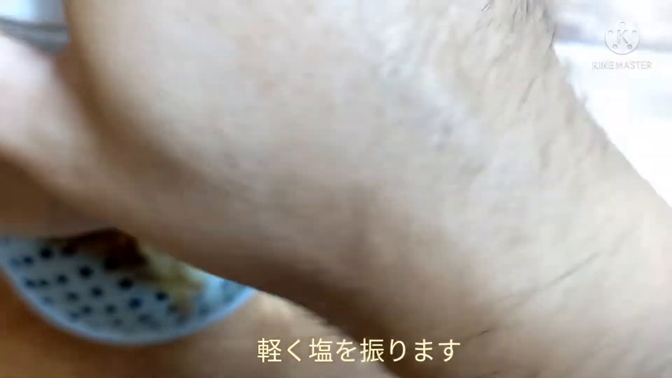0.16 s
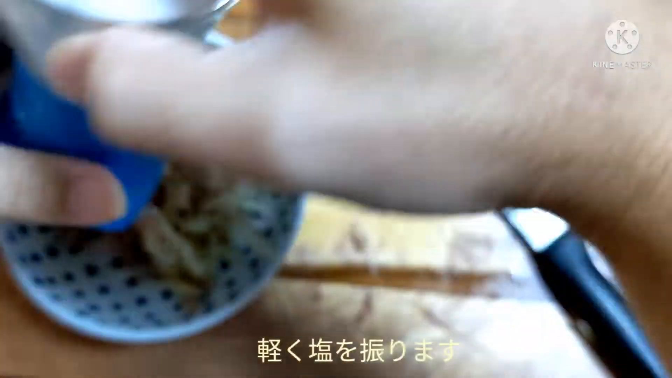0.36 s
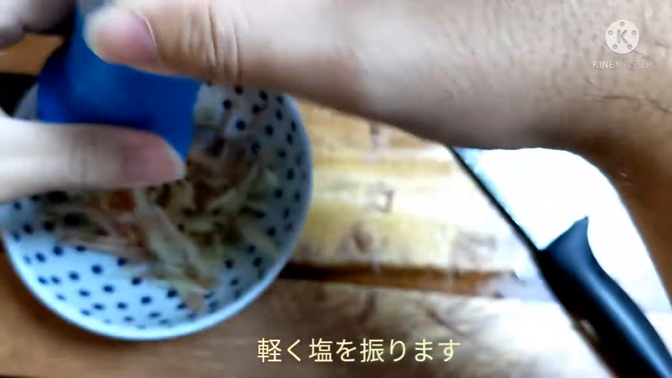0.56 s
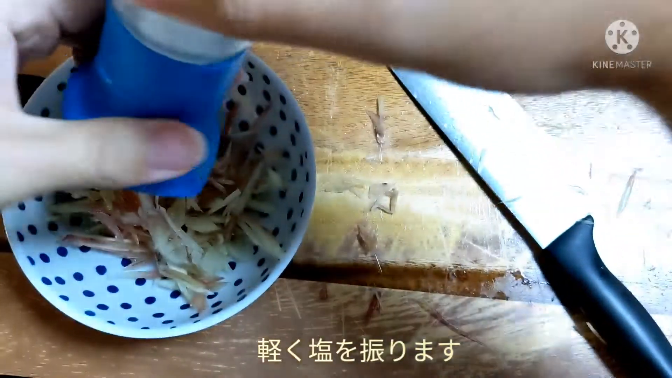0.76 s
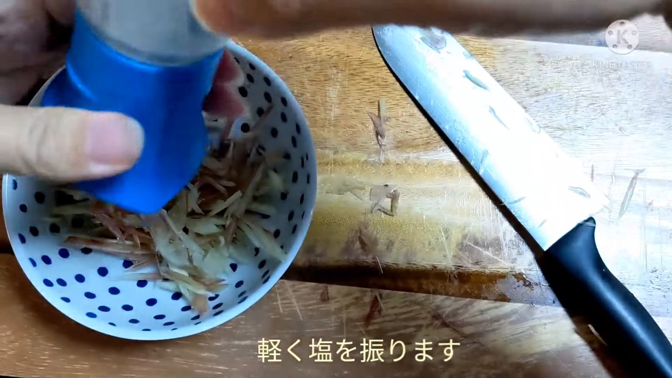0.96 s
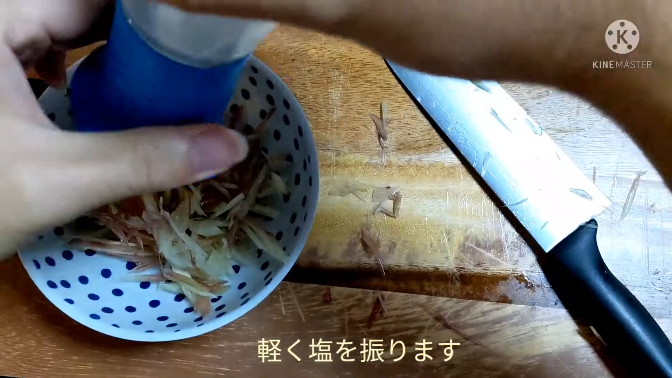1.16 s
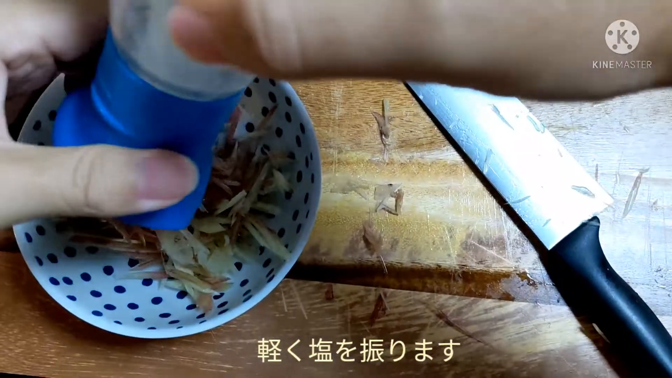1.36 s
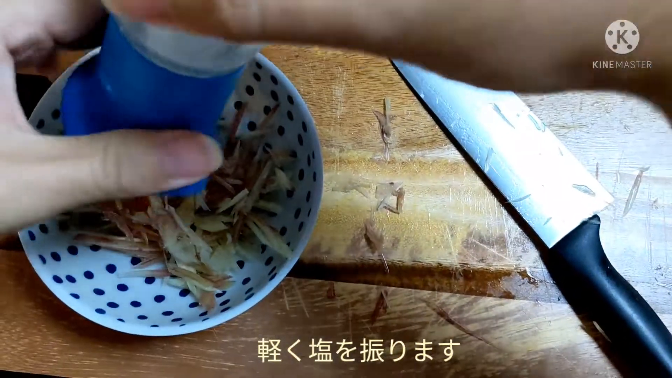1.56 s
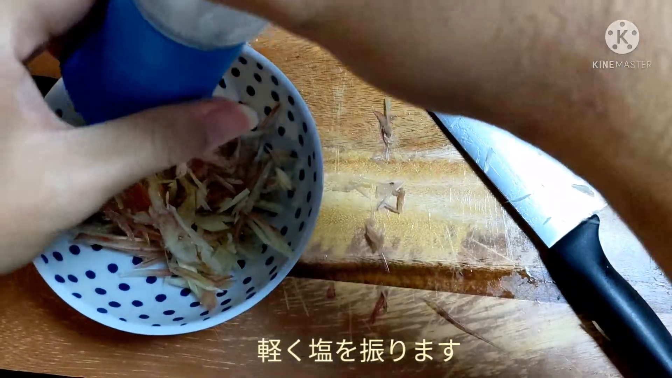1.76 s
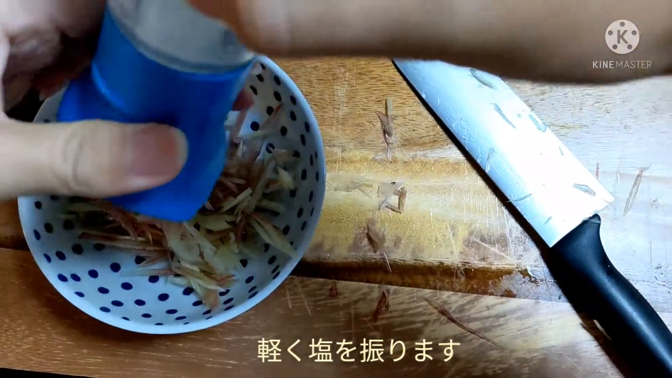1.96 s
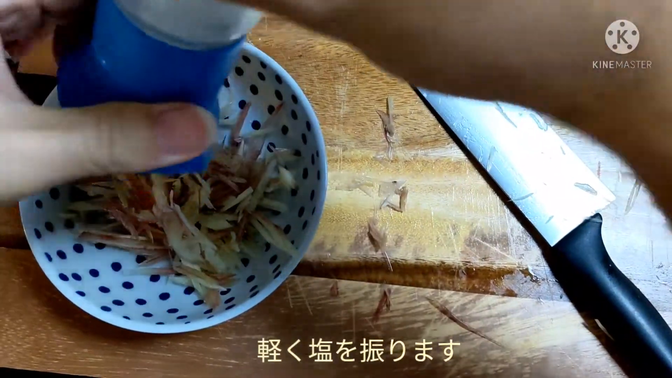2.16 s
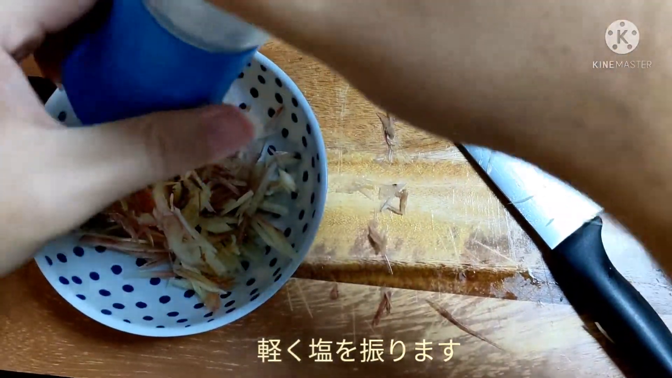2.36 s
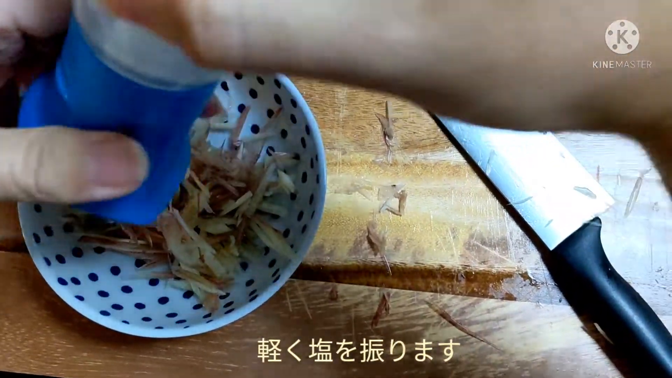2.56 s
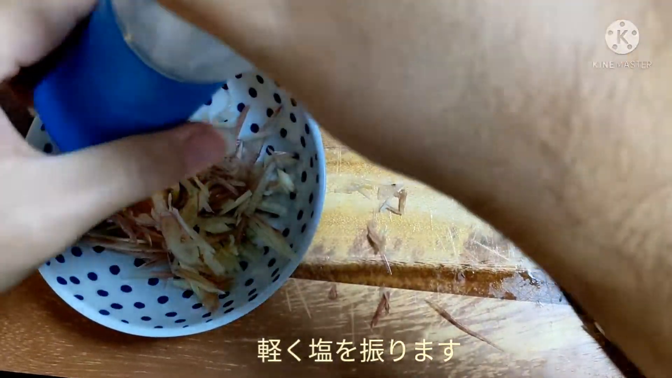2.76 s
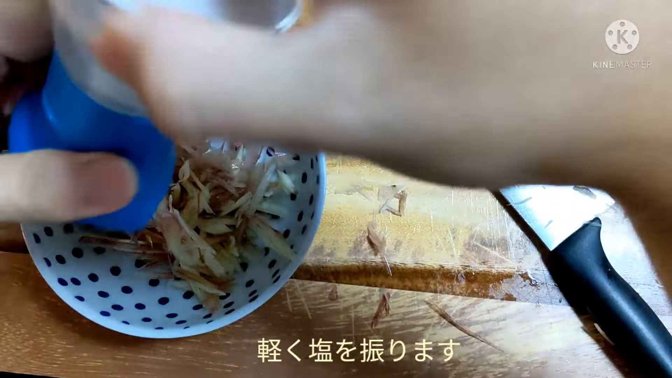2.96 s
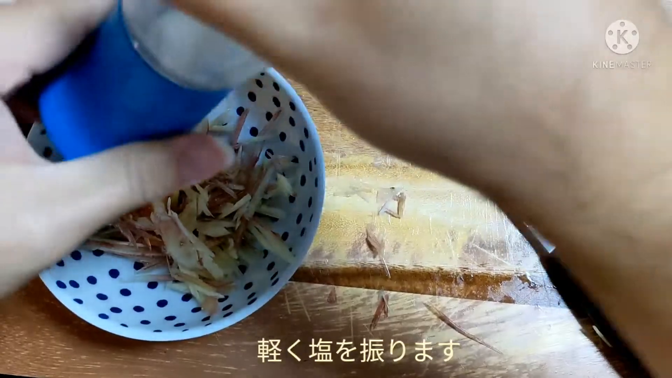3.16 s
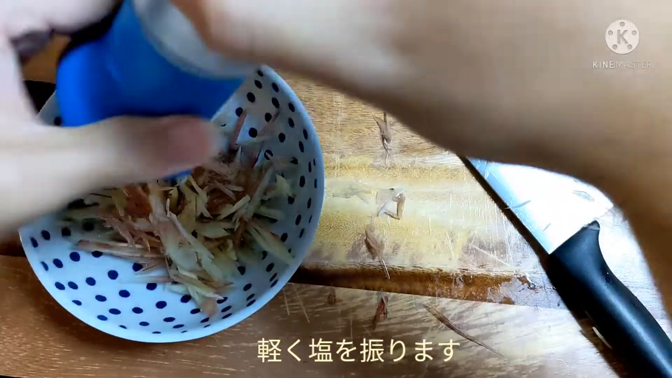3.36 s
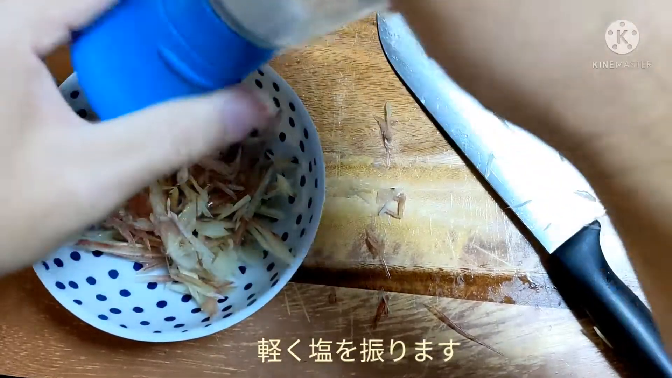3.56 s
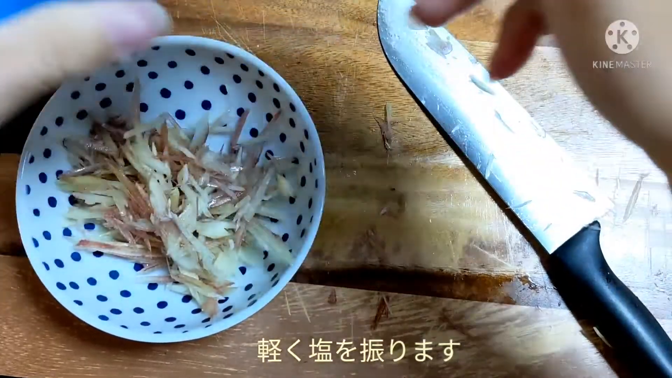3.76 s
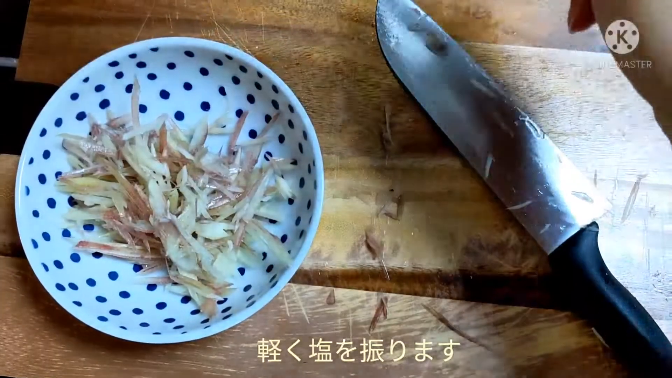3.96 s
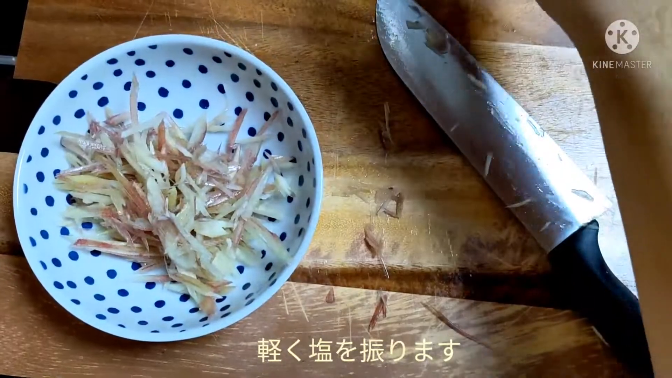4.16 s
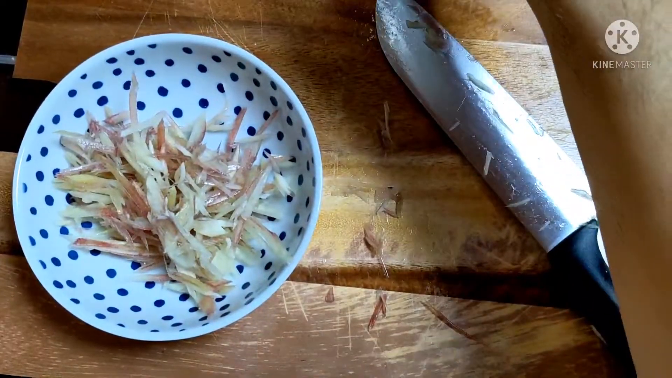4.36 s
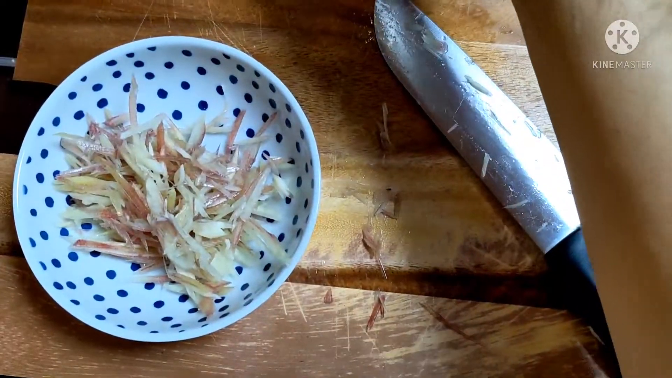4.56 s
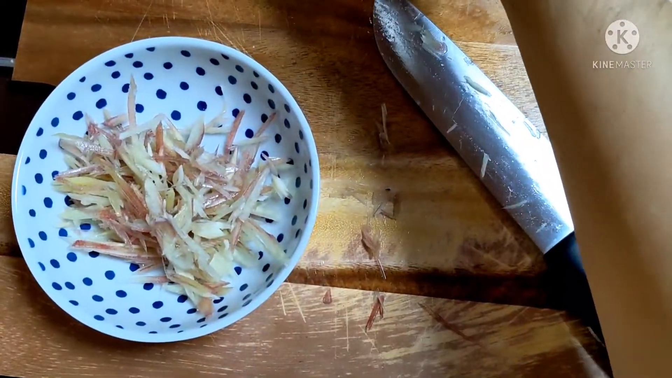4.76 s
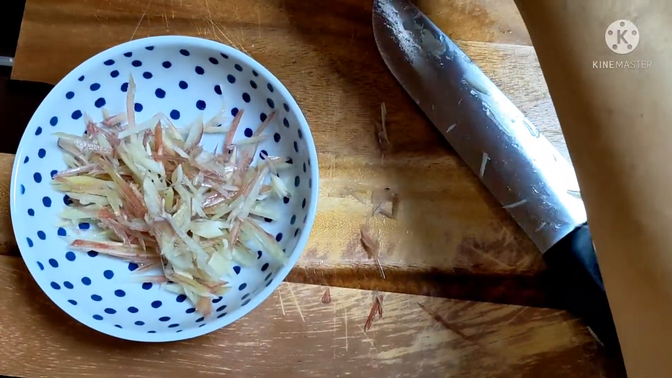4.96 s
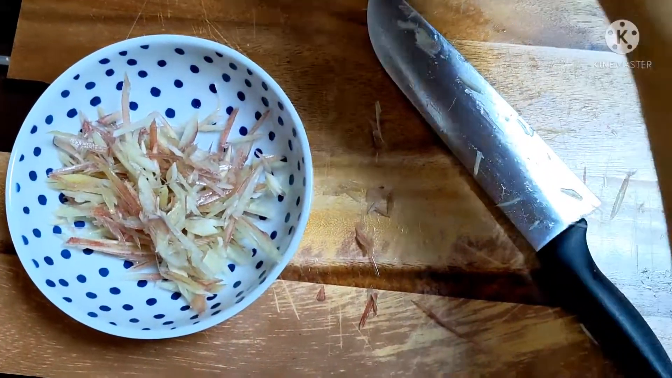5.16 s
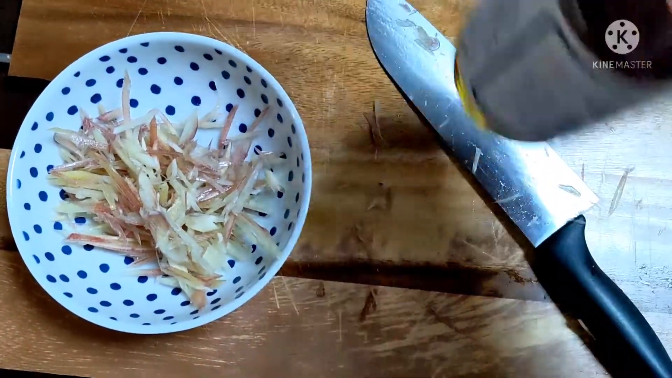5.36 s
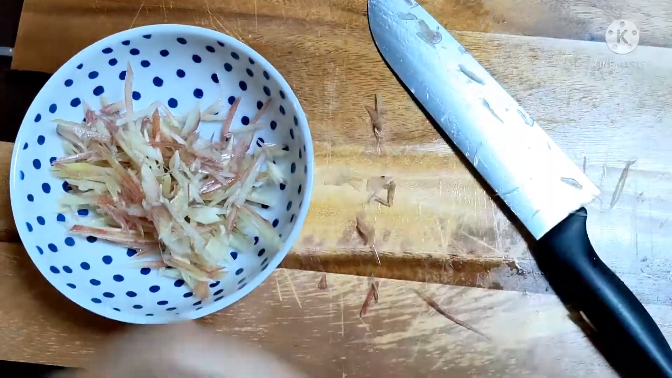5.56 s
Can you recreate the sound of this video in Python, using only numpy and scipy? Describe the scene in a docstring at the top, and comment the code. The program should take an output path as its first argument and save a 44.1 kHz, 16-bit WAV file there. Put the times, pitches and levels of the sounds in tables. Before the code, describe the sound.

In a small quiet kitchen, close to a phone's stereo microphones, a plastic salt mill is twisted about seventeen times in short strokes, crunching and cracking crystals. A finger squeaks faintly once near the start. After the grinding stops come soft sleeve rustles, then one loud wooden knock with small bumps as the mill is set down, and light shuffling and dry ticks over steady hum and hiss.

```python
"""A quiet kitchen, close to a bowl, heard by the two microphones of a phone over steady hum and hiss.
A plastic salt mill is twisted in short strokes: crunching and cracking salt is noise through the mill's resonances.
A finger squeaks once on the cap, a wavering tone with its lower octave. Later the mill is set down on a wooden
counter and a bottle is picked up: knocks ring decaying modes and a noise thud, among dry ticks, rustles and rumble."""
import sys
import numpy as np
from scipy import signal
from scipy.fft import rfft, irfft, next_fast_len
from scipy.io import wavfile
from scipy.ndimage import uniform_filter1d, map_coordinates

SR = 44100
rng = np.random.default_rng(int(sys.argv[2]) if len(sys.argv) > 2 else 0)


def store_pcm(level_fs):
    """Save levels as 16-bit WAV."""
    pcm = np.round(np.clip(level_fs, -1, 1) * 32767).astype(np.int16)
    wavfile.write(sys.argv[1], SR, np.atleast_2d(pcm).T)


N = 246941

# likeness of left and right microphone: frequency_hz, correlation (-1 to 1)
LIKENESS = [(60, 0.81), (180, 0.97), (550, 0.32), (1650, -0.41), (4970, -0.089), (15000, 0.14)]
# things meeting the counter: start_s, relative level_db, contact_ms (time to the peak of the push)
CONTACTS = [(4.7336, -6, 0.17), (4.965, -45, 0.63), (4.9902, -23.5, 0.75), (5.033, -28.5, 0.83),
            (5.055, -39, 1), (5.083, -34, 1), (5.128, -42.5, 1)]
SLOW_S = np.arange(0, N / SR + .002, .001)  # clock of the slow controls, s


def amp(db):
    """dB to gain."""
    return 10 ** (np.asarray(db) / 20)


def unit(x):
    """Scaled to rms 1."""
    return x / np.sqrt(np.mean(x ** 2) + 1e-20)


def along(points, hz):
    """Values between (Hz, value) points, joined on a log frequency axis."""
    f, v = np.transpose(points)
    return np.interp(np.log(hz + 1), np.log(f + 1), v)


def wobble(rate):
    """A smooth random curve, rate knots a second."""
    knots = rng.standard_normal(int(N * rate / SR) + 4)
    return map_coordinates(knots, [np.arange(N) * rate / SR])


def per_sample(slow):
    """A control on the slow clock, one value per sample."""
    return np.interp(np.arange(N) / SR, SLOW_S, slow)


def swells(rows):
    """Gain of bell-shaped swells (s, half length s, dB, ..), one for each level column."""
    s, half, *levels = np.transpose(rows)[:, :, None]
    bell = np.exp(-((SLOW_S - s) / half) ** 2)
    return [per_sample(np.sqrt((bell * amp(db) ** 2).sum(axis=0))) for db in levels]


def filtered(x, response):
    """x times a complex response of frequency."""
    m = next_fast_len(N + SR // 2)
    return irfft(rfft(x, m) * response(np.fft.rfftfreq(m, 1 / SR)), m)[..., :N]


def resonant(modes):
    """Causal response of (Hz, width Hz, dB) resonances, summed with alternating sign."""
    def response(f):
        total = 0
        for k, (center, width, db) in enumerate(modes):
            mode = 1j * f * width / (center * center - f * f + 1j * f * width)
            total = total + (-1) ** k * amp(db) * mode
        return total
    return response


def rush(spectrum, alike):
    """Stereo noise of rms 1 with a given spectrum; mid and side are mixed to the wanted likeness."""
    def mid_side(hz):
        turn = np.arccos(np.clip(along(alike, hz), -1, 1)) / 2
        return amp(along(spectrum, hz)) * [np.cos(turn), np.sin(turn)]
    mid, side = filtered(rng.standard_normal((2, N)), mid_side)
    return unit(np.array([mid + side, mid - side]))


def tails(t60s, length):
    """Two noises in which each frequency dies at its own speed; left has energy 1."""
    hz, t, z = signal.stft(rng.standard_normal((2, length)), SR, nperseg=256)
    turn = np.arccos(np.clip(along(LIKENESS, hz), -1, 1))[:, None] / 2
    decay = amp(-60 * t / along(t60s, hz)[:, None])
    mid, side = z * decay * [np.cos(turn), np.sin(turn)]
    pair = signal.istft(np.array([mid + side, mid - side]), SR, nperseg=256)[1][:, :length]
    return pair / np.linalg.norm(pair[0])


def room(x, gap_s):
    """The kitchen's answer at both microphones: decaying noise after a gap."""
    # frequency_hz, t60_s
    kitchen_t60 = [(150, .28), (800, .23), (2500, .25), (5000, .2), (12000, .12)]
    late = np.pad(np.atleast_2d(x), ((0, 0), (int(gap_s * SR), 0)))
    return signal.fftconvolve(late, tails(kitchen_t60, SR // 2), axes=1)[:, :N]


def placed(x, pan_db, lag):
    """Left-right level difference, and the left microphone reached lag samples later."""
    left = filtered(x, lambda hz: np.exp(-2j * np.pi * hz * lag / SR))
    return np.array([left * amp(pan_db / 2), x * amp(-pan_db / 2)])


def smear(power, life_s):
    """Power spread over an exponential tail, energy kept."""
    keep = np.exp(-1 / (life_s * SR))
    return signal.lfilter([1 - keep], [1, -keep], power)


def heard(power, response, pan_db, lag, near_db, far_db):
    """Noise of that power through a body: straight, scattered by moving hands within ms, and from the walls."""
    straight = placed(np.sqrt(power) * rng.standard_normal(N), pan_db, lag)
    near = amp(near_db) ** 2 * smear(power, life_s=.001) * amp([pan_db, -pan_db])
    far = amp(far_db) ** 2 * smear(power, life_s=.012)
    sound = straight + np.sqrt(near + far) * rng.standard_normal((2, N))
    # the body only colours: its mean power gain is 1
    return filtered(sound, lambda hz: response(hz) / np.sqrt(np.mean(np.abs(response(hz)) ** 2)))


def bursts(events, rise_s):
    """Power of a bright and of a dull excitation: one short burst for each event."""
    power, t = np.zeros((2, N + SR)), np.arange(900) / SR
    for s, db, dull_db, life_ms in events:
        shape = np.exp(-t * 1000 / life_ms) * (1 - np.exp(-t / rise_s))
        power[:, round(s * SR):][:, :len(t)] += (amp([[db], [db + dull_db]]) * shape / shape.max()) ** 2
    return power[:, :N]


def kitchen():
    """Steady air, soft handling noises and two faint whistles, all of them shaped noise."""
    # kitchen hum and microphone hiss: frequency_hz, relative level_db per Hz
    air_spectrum = [(12, -42.5), (20, -11.5), (49, -1), (86, -4.5), (172, -9), (270, -16.5), (347, -43.5),
                    (388, -15.5), (698, -12.5), (802, -14), (1090, -10.5), (1910, -16.5), (2600, -17.5),
                    (13500, -28.5), (16000, -22)]
    # arms leaning on the counter: center_s, half_length_s, level_db
    leans = [(.3, 0.052, -61), (2.06, .03, -68), (3.49, 0.0067, -61), (3.95, 0.034, -64), (5.3, .15, -71),
             (5.566, 0.023, -63.5)]
    # sleeves brushing: center_s, half_length_s, level_db
    rustles = [(3.765, .012, -69), (3.89, 0.028, -66.5), (4.03, 0.029, -75), (4.2, 0.15, -74),
               (4.97, 0.025, -75), (5.13, 0.027, -83), (5.448, 0.0097, -79), (5.506, .015, -79)]
    # colour of the sleeves: frequency_hz, relative level_db per Hz
    sleeve_spectrum = [(880, -38.5), (1500, 0), (1720, -4.5), (2040, -6), (4080, -11), (7390, -10.5),
                       (14800, -16.5), (16000, -27)]
    # hands sliding on the counter: time_s, level_db
    slides = [(3.67, -88), (3.95, -72), (4.2, -88), (4.27, -85), (4.45, -93), (4.7, -77), (4.92, -70),
              (5.0, -65), (5.11, -69), (5.2, -65), (5.43, -67), (5.5, -61.5), (5.6, -64)]
    # two thin faint whistles swell: center_s, half_length_s, low_db, high_db
    whistles = [(4.16, 0.071, -75.5, -73), (4.278, 0.017, -63, -65), (4.324, 0.013, -61.5, -64),
                (4.42, .07, -71.5, -76)]

    air = amp(-66.5 + 0.27 * wobble(14.0)) * rush(air_spectrum, LIKENESS)

    rumble_gain = np.hypot(amp(-71.5), swells(leans)[0])  # steady low rumble of the counter, and the leans
    rumble_spectrum = [(30, -14), (70, 0.5), (150, 2.0), (350, -9.5), (600, -35.0)]
    rumble = rumble_gain * amp(1.5 * wobble(5.41)) * rush(rumble_spectrum, LIKENESS)

    hiss = swells(rustles)[0] * amp(3.6 * wobble(4.1)) * rush(sleeve_spectrum, LIKENESS)

    slide_db = np.interp(np.arange(N) / SR, *np.transpose(slides), left=-150, right=-150)
    slide_spectrum = [(120, 3.0), (250, -5.0), (700, -4.5), (1200, -6.5), (1650, -8.0),
                      (2600, -12.5), (4000, -63.5)]
    shuffle = amp(slide_db + 2.7 * wobble(29)) * rush(slide_spectrum, LIKENESS)

    low, high = swells(whistles)
    low = low * rush([(6300, -37), (7200, -6.0), (7500, -2), (7800, -8.5), (9000, -20)], LIKENESS)
    high = high * rush([(11800, -35), (12700, -10), (13150, 3), (13500, -8), (14500, -32)], LIKENESS)
    return air + rumble + hiss + shuffle + low + high


def twists():
    """Power reaching burrs, collar, cap, wall and palm: each twist bites, holds with a surge, and lets go."""
    # one row a twist: start_s, attack_s, hold_s, release_s, relative crunch_db,
    # hardest crunch at share of hold, its surge_db, collar_db over crunch,
    # tightest grip at share of hold, its surge_db, cap_db and wall_db over collar,
    # drift_db from bite to letting go
    strokes = [(-.03, .03, 0.11, 0.092, -51.5, 0.93, 4, -5.5, 0.9, 11.5, -13.5, -4, 2.5),
               (0.209, 0.023, .13, 0.088, -53.5, 0.91, 4.1, -5, 0.86, 6, -4.5, -11.5, 1),
               (.48, 0.085, 0.19, 0.09, -62, 0.7, 2.9, -10.5, 0.51, 0.8, -7, -4.5, 1.5),
               (.62, 0.054, 0.086, 0.031, -57, 0.22, 6.3, -3, 0.5, 3.5, -10.5, -9, -3.5),
               (.785, 0.016, .1, .02, -57, 0.47, 5.2, -12, 0.57, 10.4, 1, -3, 3),
               (.895, 0.016, 0.039, 0.095, -51.5, 0.93, 5.7, -9, 0.98, 8, -5.5, -8, 8),
               (1.04, 0.071, 0.12, .11, -48.5, 0.53, 2, -8.5, 0.89, 10.3, -5, -4, -2),
               (1.334, 0.023, 0.2, 0.023, -55, 0.46, 4.5, -8, .48, 5.4, -4.5, -7, -1.5),
               (1.566, 0.05, 0.19, 0.077, -52.5, 0.48, 4.3, -6.5, 0.44, 7.6, -6.5, -6.5, -5),
               (1.887, 0.028, 0.201, .022, -53.5, 0.58, 7.1, -8.5, 0.45, 4.6, -7.5, -7.5, 0.5),
               (2.141, 0.019, 0.19, 0.043, -52, 0.089, 3.5, -5, 0.79, 6.2, -9.5, -8, 1.5),
               (2.43, 0.029, 0.11, 0.053, -50, .8, 4.3, -6.5, 0.47, 7.8, -6, -9, 0.5),
               (2.637, 0.017, 0.13, 0.073, -49.5, 0.062, 10.6, -3, .1, 2, -8, -7.5, 3.5),
               (2.848, 0.046, 0.13, 0.09, -52, 0.69, 1.5, -8, 0.43, 9.4, -4.5, -6.5, -1),
               (3.069, 0.024, 0.12, 0.071, -50, 0.81, 1.8, -9, 0.85, 11.7, -2.5, -6.5, -1),
               (3.26, 0.032, 0.11, 0.073, -50, 1, 3.6, -9, 0.37, 7, -3.5, -4.5, 1),
               (3.45, 0.019, 0.12, 0.054, -52.5, 0.064, 7.2, -4.5, .75, 3.4, -7, -4, -3)]
    # the grip shifts and parts of the mill ring out: center_s, half_length_s, cap_db, wall_db, cupped palm_db
    grip_shifts = [(.085, .02, -58.5, -47, -80), (.285, .05, -63.5, -66, -67.5),
                   (.72, .015, -60.5, -59, -78), (.93, .015, -67, -77, -87), (1.13, .02, -70, -73, -72),
                   (1.69, .02, -56, -62, -78), (2.02, .03, -63.5, -79, -69),
                   (2.26, .02, -58.5, -56.5, -70.5), (3.0, .025, -59.5, -78, -93),
                   (3.21, .015, -79, -51.5, -76.5), (3.48, .015, -73, -65, -75)]
    edge_db = 30  # climb over one attack time, fall over one release time
    crunch_surge_s, grip_surge_s = 0.02, 0.024  # standard deviations of the two surges
    cap_follows, wall_follows = 0.17, 0.81  # share of the grip's surge that cap and wall take

    power = np.zeros((5, len(SLOW_S)))
    for (start, attack, hold, release, crunch_db, crunch_at, surge_db, collar_db,
         grip_at, grip_db, cap_db, wall_db, drift_db) in strokes:
        t = SLOW_S - start - attack  # 0 where the hold begins
        outside = np.clip(np.maximum(-t / attack, (t - hold) / release), 0, 4)
        turn_db = crunch_db - edge_db * outside
        turn_db = turn_db + drift_db * (np.clip(t / hold, 0, 1) - .5)
        surge = surge_db * np.exp(-((t - crunch_at * hold) / crunch_surge_s) ** 2 / 2)
        grip = grip_db * np.exp(-((t - grip_at * hold) / grip_surge_s) ** 2 / 2)
        over_db = [surge,
                   collar_db + grip,
                   collar_db + cap_db + cap_follows * grip,
                   collar_db + wall_db + wall_follows * grip]
        power[:4] += amp(turn_db + over_db) ** 2
    power = np.array([per_sample(part) for part in power])
    power[2:] += np.square(swells(grip_shifts))
    return power


def grit(per_s, spread_db, life_s, smooth, largest):
    """Power of mean 1: tiny bursts of exponentially spread size over a steady share."""
    sizes = np.minimum(rng.exponential(size=N), largest)
    hits = (rng.random(N) < per_s / SR) * amp(spread_db * sizes) ** 2
    power = smear(hits, life_s)
    return (power / power.mean() + smooth) / (1 + smooth)


def patchy(x, depth_db):
    """Random patches of gain over time and frequency: the grip keeps changing the colour."""
    z = signal.stft(x, nperseg=256)[2]
    field = uniform_filter1d(rng.standard_normal(z.shape[1:]), size=5, axis=0)
    field = uniform_filter1d(field, size=9, axis=1)
    return signal.istft(z * amp(depth_db * unit(field)), nperseg=256)[1][:, :N]


def mill():
    """Crushed salt excites the burrs, their collar, the hollow cap and the wall; the balance shifts with the grip."""
    # crystals that crack: start_s, relative level_db, dullness_db (dull over bright)
    crack_rows = [(0.0074, -25, -29), (0.0674, -35, 4), (0.0801, -37, 12), (0.094, -21, -8),
                  (0.1553, -34.5, -5), (0.2358, -25.5, -6.5), (0.3493, -20.5, -11), (0.3794, -32, -22),
                  (0.6784, -25.5, -21), (0.8046, -44, -13), (0.844, -33, -18), (0.9411, -12.5, -8.5),
                  (0.995, -28.5, -26), (1.125, -24, -26), (1.1674, -24, -23), (1.174, -13.5, -11),
                  (1.2461, -33, -24), (1.3526, -43, -16), (1.391, -31, -11), (1.435, -30, -18),
                  (1.45, -39, -16), (1.5833, -37, -24), (1.6068, -22.5, -24), (1.6488, -21, -22),
                  (1.681, -25, -10), (1.717, -21, -32), (1.811, -31, -8), (1.8209, -24.5, -11),
                  (1.9116, -51, -11), (2.0264, -40, -31), (2.076, -29.5, -29), (2.0789, -27, -30),
                  (2.101, -32, -21), (2.154, -34, -25), (2.1872, -22, -30), (2.2305, -45, -9),
                  (2.3182, -22, -11), (2.447, -30, -32), (2.513, -28, -21), (2.5514, -15, -37),
                  (2.573, -19.5, -36), (2.6538, -20, -36), (2.664, -19, -30), (2.6716, -18, -42),
                  (2.8192, -30, -10), (3.0203, -33, -25), (3.1455, -36, -21), (3.3607, -41, -9),
                  (3.389, -30, -15), (3.395, -30, -31), (3.4689, -20.5, -34), (3.489, -24, -16),
                  (3.516, -29, -17)]
    # colour of the burrs: frequency_hz, relative level_db per Hz
    burr_spectrum = [(2710, -20), (4600, -7.5), (5210, -4), (5700, -2.5), (6460, -5.5), (7320, 2.5),
                     (10300, -5), (14900, 0), (15700, -13.5), (16000, -30)]
    # ring that holds the burrs: frequency_hz, width_hz, relative level_db
    collar_modes = [(3050, 900, 0), (3753, 126, 6), (3947, 110, 4.5), (4580, 760, 3)]
    # hollow cap: frequency_hz, width_hz, relative level_db
    cap_modes = [(470, 390, -6.5), (736, 800, 0), (1128, 850, 2), (1620, 316, -4)]
    # mill wall: frequency_hz, width_hz, relative level_db
    wall_modes = [(1905, 283, 9.5), (2320, 240, 12), (2720, 350, 7.5)]
    # cupped palm: frequency_hz, width_hz, relative level_db
    palm_modes = [(358, 170, 6), (560, 600, 0)]

    crunch, ring, hollow, wall, cupped = twists()
    pan_db = -2.5 + 1.2 * wobble(14)  # left over right, swaying
    salt = grit(per_s=600, spread_db=2.8, life_s=.0006, smooth=.7, largest=4.5)
    salt = salt * amp(-2.5 + 0.9 * wobble(35)) ** 2
    crack_ms = 0.26  # decay time of a crack
    bright, dull = bursts([row + (crack_ms,) for row in crack_rows], rise_s=0.000077)

    # a broad resonance narrows the skirts of each part's own modes
    burrs = lambda hz: amp(along(burr_spectrum, hz))
    collar = lambda hz: resonant(collar_modes)(hz) * resonant([(3700, 2500, 0)])(hz)
    cap = lambda hz: resonant(cap_modes)(hz) * resonant([(850, 1400, 0)])(hz)
    shell = lambda hz: resonant(wall_modes)(hz) * resonant([(2150, 1500, 0)])(hz)
    snap = resonant([(2170, 510, -3.5), (3700, 1300, 0.0)])

    layers = [(salt * crunch + amp(-9.0) ** 2 * bright, burrs),
              (amp(-8.5) ** 2 * dull, snap),
              (cupped, resonant(palm_modes)),
              (salt * ring * amp(1.3 * wobble(56)) ** 2, collar),
              (salt * hollow * amp(0.85 * wobble(41.02)) ** 2, cap),
              (salt * wall * amp(0.55 * wobble(45)) ** 2, shell)]
    sound = sum(heard(power, body, pan_db, lag=14.2, near_db=3.0, far_db=-8) for power, body in layers)
    return patchy(sound, depth_db=1.73)


def squeak():
    """Skin slips on plastic at a wavering rate; uneven slips add the octave below."""
    # time_s, pitch_hz, level_db, lower octave_db over the level
    glide = [(0.512, 646, -82, 24), (0.517, 648, -63.5, -1), (.535, 594, -63, -3), (.553, 607, -55, -26),
             (.588, 612, -54, -23), (.594, 620, -62, -25), (.618, 605, -67, -25), (.655, 615, -85, -16)]
    s, hz, db, lower_db = np.transpose(glide)
    t = np.arange(N) / SR
    phase = 2 * np.pi * np.cumsum(np.interp(t, s, hz) + 7.7 * wobble(110)) / SR
    lower = amp(np.interp(t, s, lower_db)) * np.sin(phase / 2)
    tone = np.sqrt(2) * (np.sin(phase) + lower) * amp(1.3 * wobble(114.8))
    level = amp(np.interp(t, s, db, left=-150, right=-150))
    return placed(tone * level, pan_db=0.5, lag=10.0)


def counter():
    """Each knock is a push set by its contact time; it rings the clear modes of the top and a dense thud."""
    # modes of the counter top: frequency_hz, relative left_db, relative right_db, t60_s
    wood_modes = [(137.5, -11.5, -12.5, 0.26), (237, -17, -17, 0.15), (396, -15, -16.5, 0.101),
                  (425, -19.5, -9, .09), (534.4, -12, -9.5, 0.2), (679, -10, -11, 0.086),
                  (779, -5, -7, 0.14), (944, -2, -1.5, 0.06), (1058, -17, -1.5, 0.075),
                  (1567, -8.5, -4, 0.077), (1712, -1.5, 7.5, 0.046)]
    # the many close modes of counter and cupboard: frequency_hz, relative level_db per Hz
    thud_spectrum = [(35, -55.5), (60, -35), (133, -27), (259, -23), (311, -21.5), (533, -7), (606, -6),
                     (786, -6), (878, -7), (1340, -14.5), (1450, -18), (1530, -19.5), (1740, -23),
                     (1910, -10), (5000, -33.5), (6500, -80), (11000, -120)]
    # how they die away: frequency_hz, t60_s
    thud_t60 = [(150, .22), (600, .15), (2000, .11), (5000, .09)]

    t, knocks = np.arange(SR // 2) / SR, np.zeros((2, N + SR))
    for s, db, contact_ms in CONTACTS:
        ring = 0
        for k, (hz, left_db, right_db, t60) in enumerate(wood_modes):
            swell = 1 - np.exp(-t * hz / 2.8)  # a mode builds up over its first cycles
            chance_db = rng.normal(0, 1.5)
            mode_db = np.array([[left_db], [right_db]]) + chance_db - 60 * t / t60
            ring = ring + (-1) ** k * amp(mode_db) * swell * np.sin(2 * np.pi * hz * t)

        onset = 1 - np.exp(-t / (0.0091 * contact_ms))
        thud = np.pad(tails(thud_t60, len(t)) * onset, ((0, 0), (0, N)))
        thud = filtered(thud, lambda hz: amp(along(thud_spectrum, hz)))[:, :len(t)]

        u = t[:600] * 1000 / contact_ms
        push = u * u * np.exp(-2 * u)
        # a longer contact rings the clear modes less
        body = amp(-4.5 - 11 * contact_ms) * ring + amp(2.5) * thud / np.abs(thud).max()
        knock = signal.fftconvolve(body, push[None] / push.sum(), axes=1)[:, :len(t)]
        knocks[:, round(s * SR):][:, :len(t)] += amp(db) * knock
    return knocks[:, :N] + amp(-10.5) * room(knocks[:, :N], gap_s=0.00551)


def slap():
    """The harder (shorter) a contact, the louder its bright crack, which the walls carry on."""
    events = [(s + .001, db - 28.5 - 30 * contact_ms, 17, 1.2) for s, db, contact_ms in CONTACTS]
    bright, dull = bursts(events, rise_s=.0003)
    bodies = resonant([(6460, 1700, 2.5), (12900, 2960, -13.5)]), resonant([(2060, 320, 0)])
    return sum(heard(power, body, np.full(N, 1.5), lag=-6.5, near_db=-6.0, far_db=1)
               for power, body in zip((bright, dull), bodies))


def ticks():
    """Short dry ticks of plastic and nails: noise bursts through a bright and a dull body."""
    # start_s, relative level_db, dullness_db (dull over bright), life_ms, left-right pan_db
    tick_rows = [(4.9844, -63, -12.5, 0.4, -6), (5.2791, -52, -13, 0.38, 17),
                 (5.4473, -53.5, -9, 0.31, 7.5), (5.5712, -48.5, -5.5, 0.42, -27.5)]
    bright, dull = bursts([row[:4] for row in tick_rows], rise_s=0.00064)
    pan_db = np.interp(np.arange(N) / SR, *np.array(tick_rows)[:, [0, 4]].T)
    bodies = resonant([(7900, 4900, -2.5), (15400, 3600, 6.5)]), resonant([(1810, 1230, 0)])
    return sum(heard(power, body, pan_db, lag=1.0, near_db=-27, far_db=-22)
               for power, body in zip((bright, dull), bodies))


def scene():
    """Everything at the two microphones."""
    return kitchen() + mill() + squeak() + counter() + slap() + ticks()


def record(dry):
    """The phone cuts the deep bass and keeps little above its band limit."""
    bass_hz, top_hz = 45, 15750
    bass = lambda hz: 1j * hz / (bass_hz + 1j * hz)
    return filtered(dry, lambda hz: bass(hz) / np.sqrt(1 + (hz / top_hz) ** 160))


dry = scene()
out = record(dry)
store_pcm(out)
```